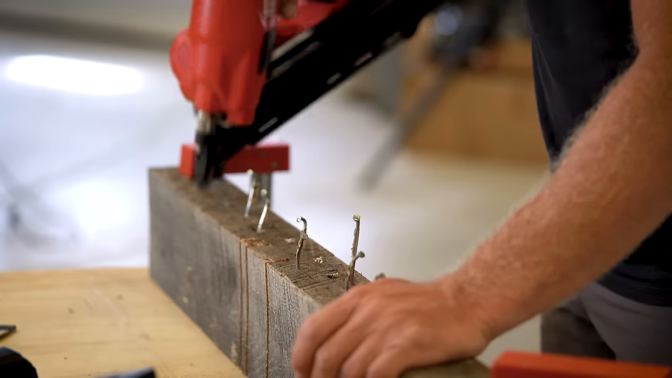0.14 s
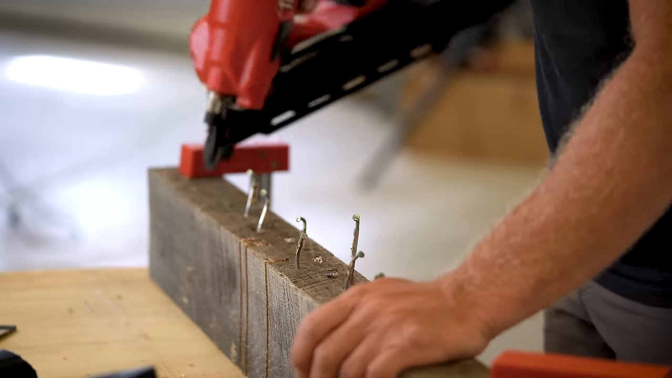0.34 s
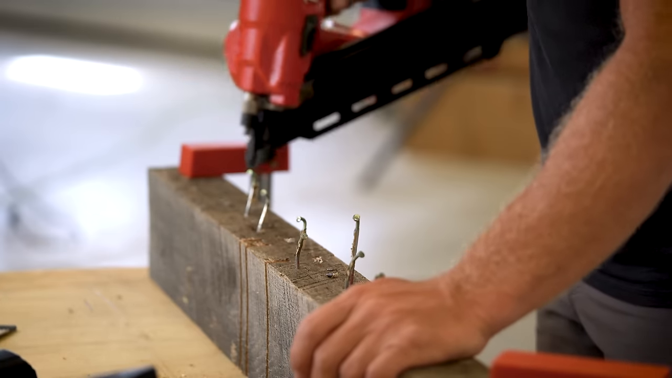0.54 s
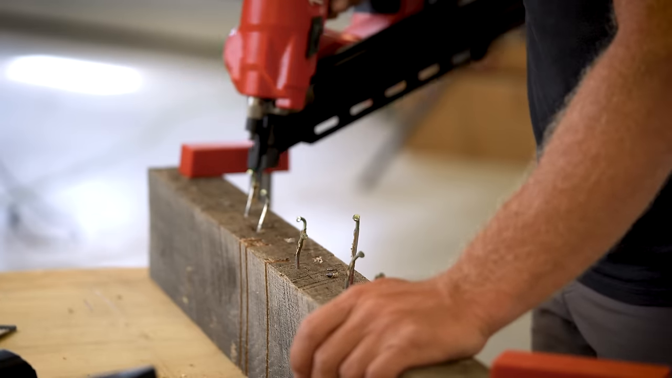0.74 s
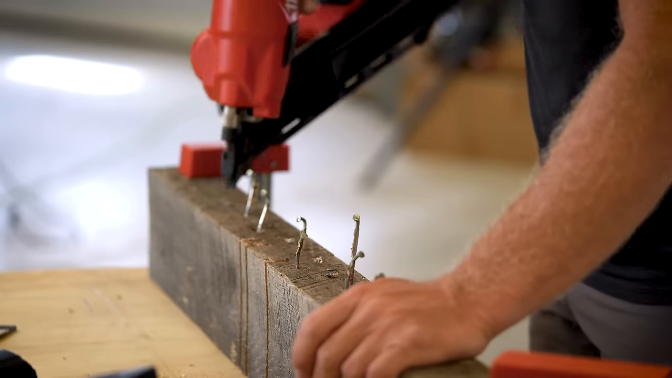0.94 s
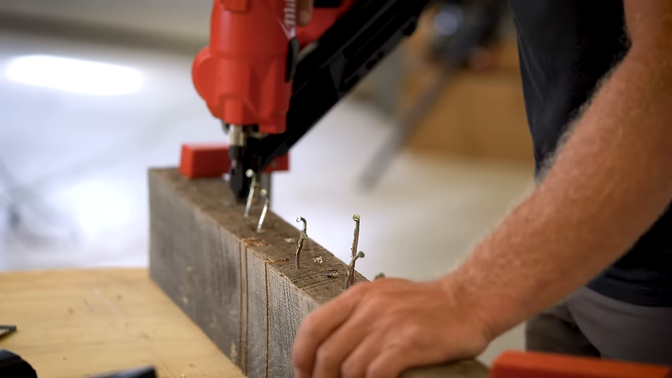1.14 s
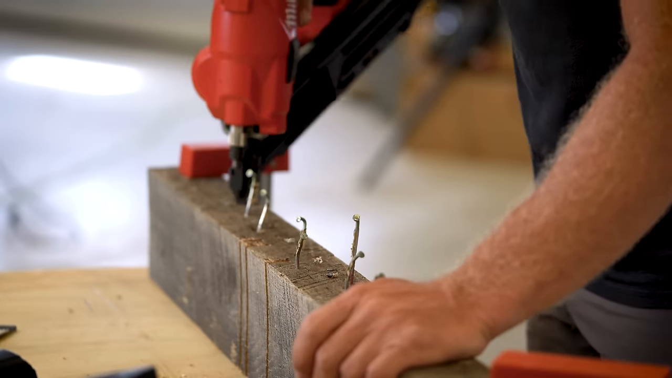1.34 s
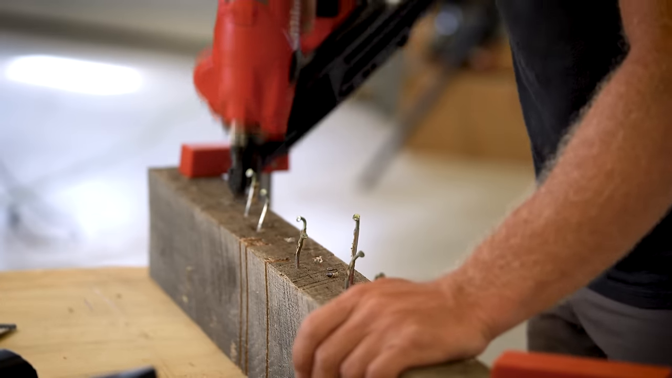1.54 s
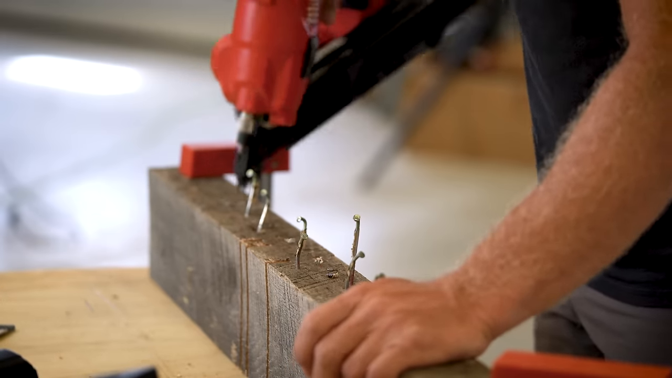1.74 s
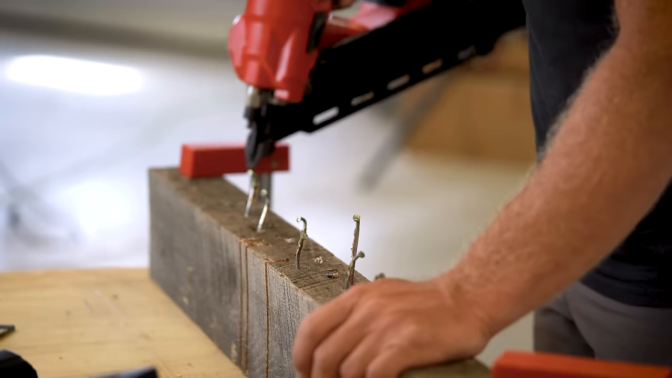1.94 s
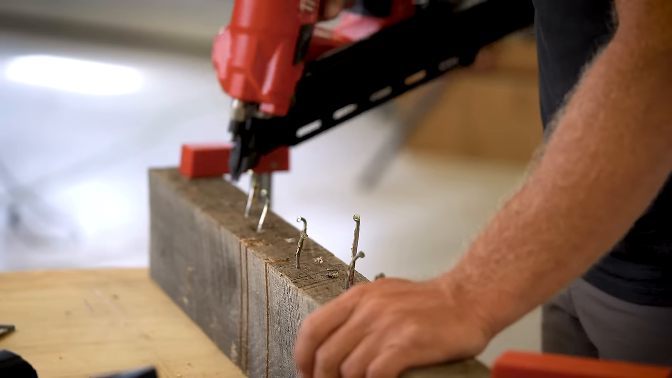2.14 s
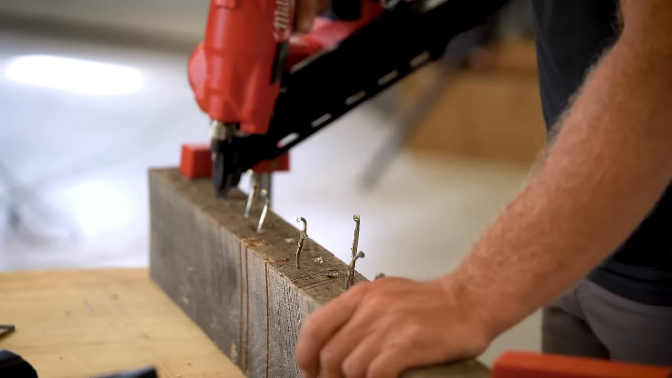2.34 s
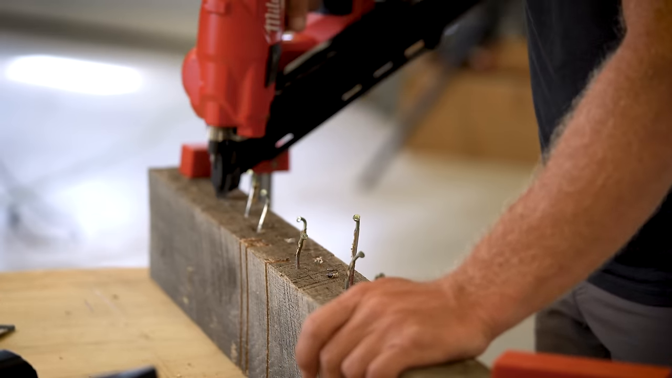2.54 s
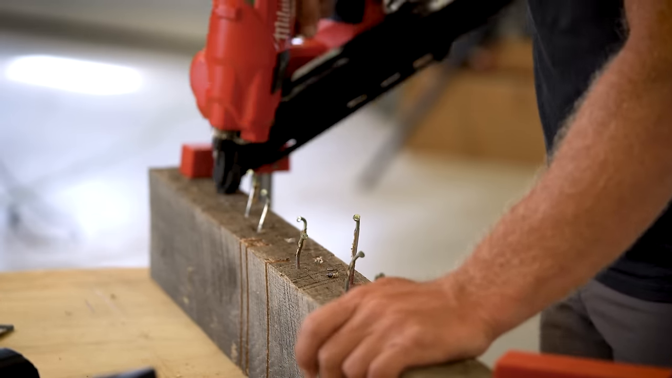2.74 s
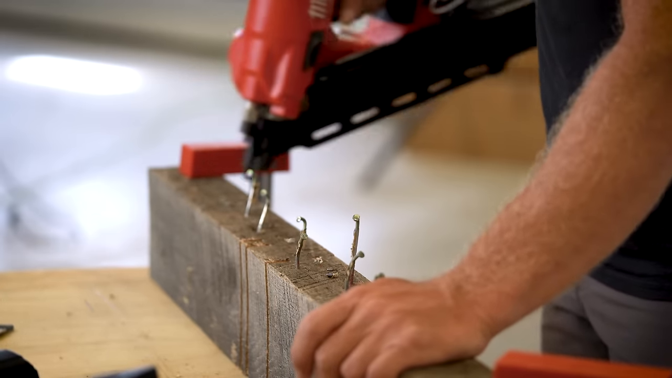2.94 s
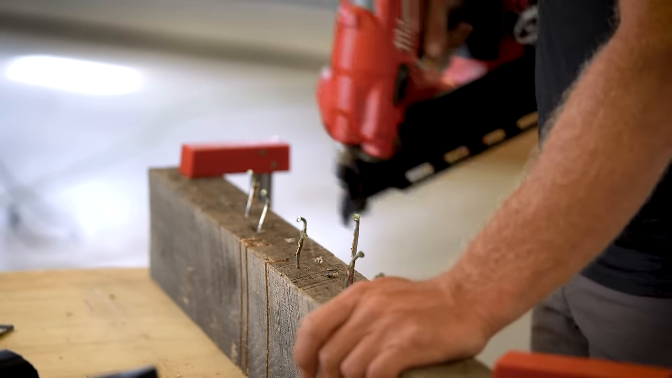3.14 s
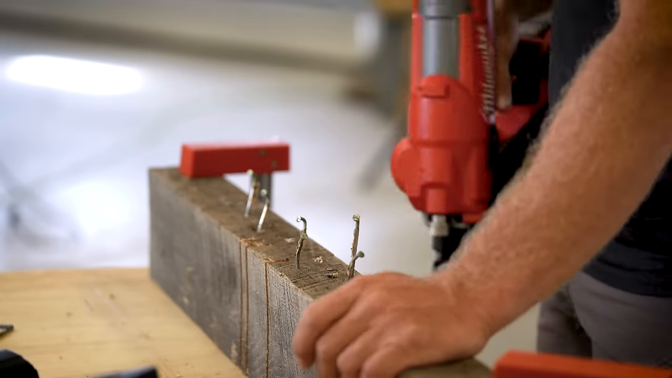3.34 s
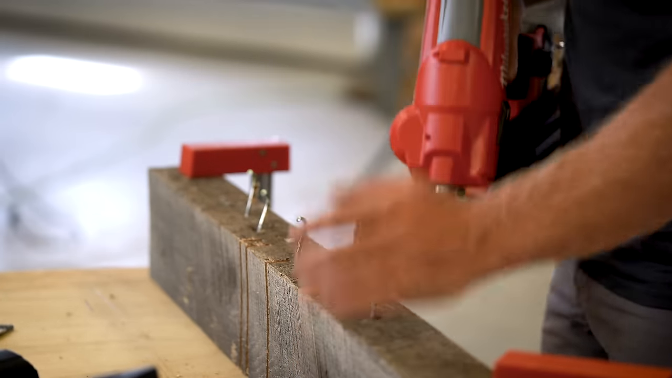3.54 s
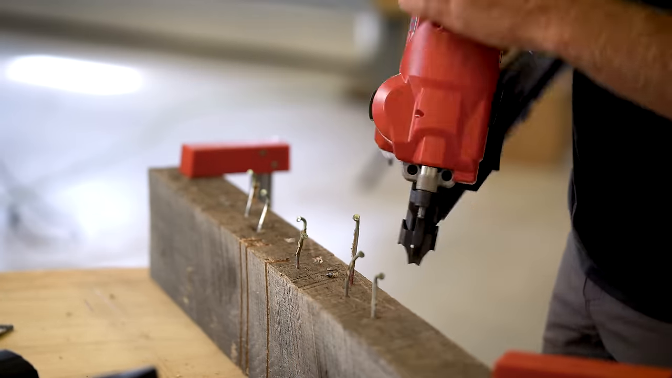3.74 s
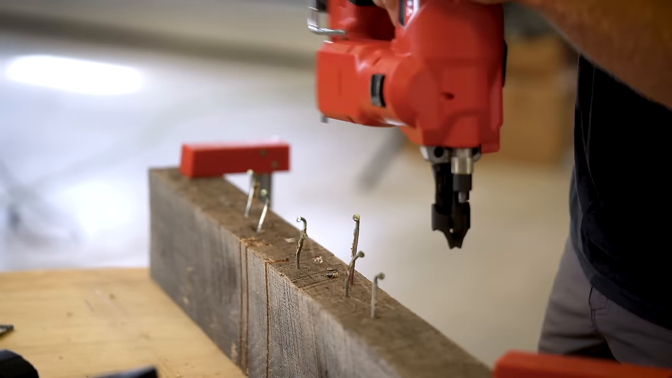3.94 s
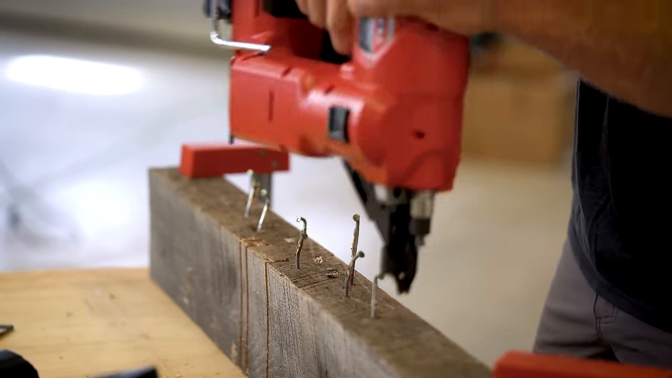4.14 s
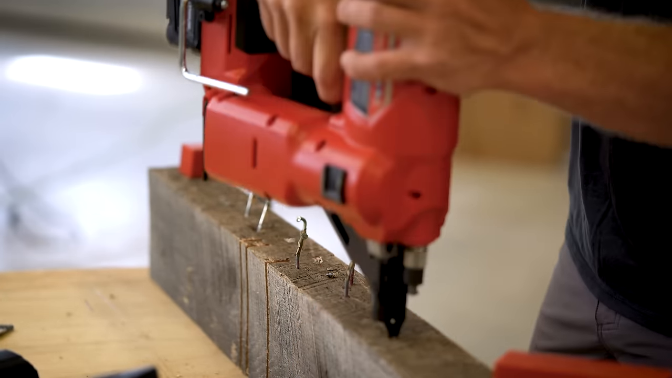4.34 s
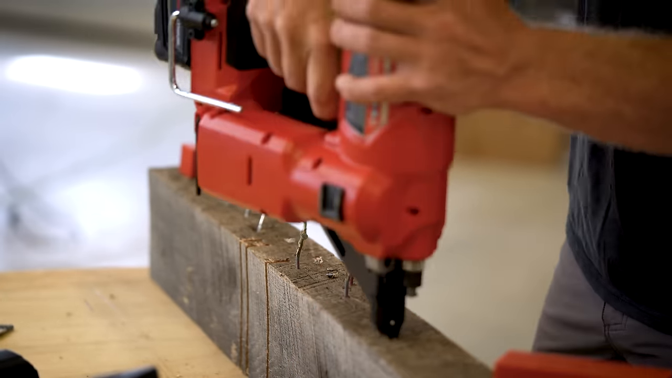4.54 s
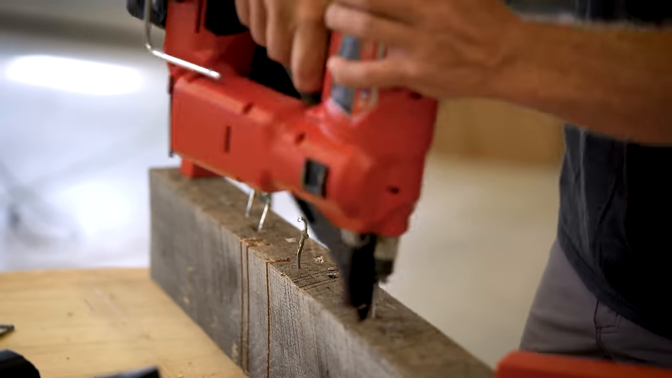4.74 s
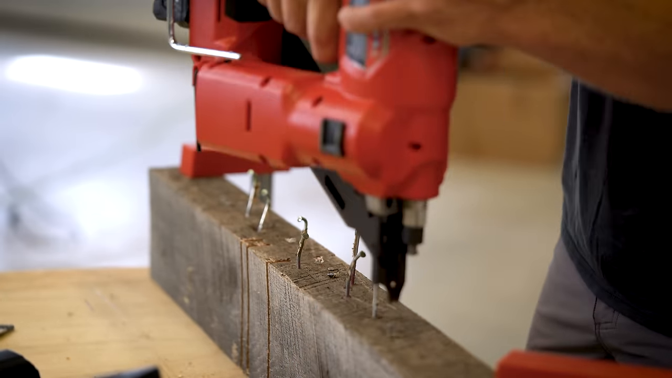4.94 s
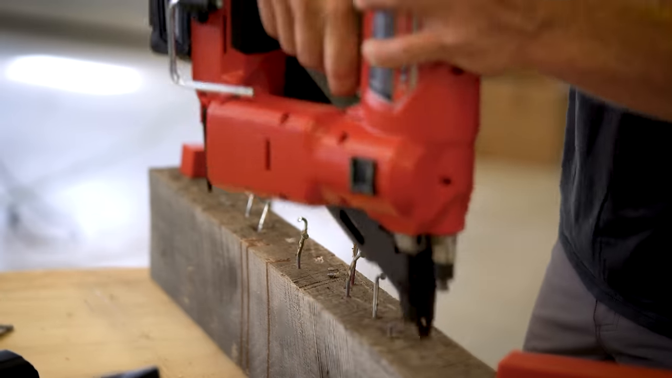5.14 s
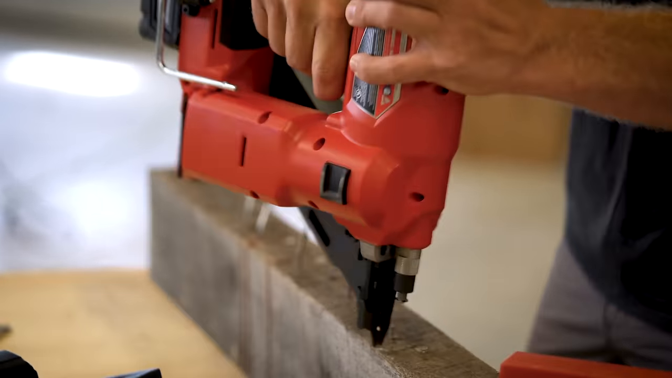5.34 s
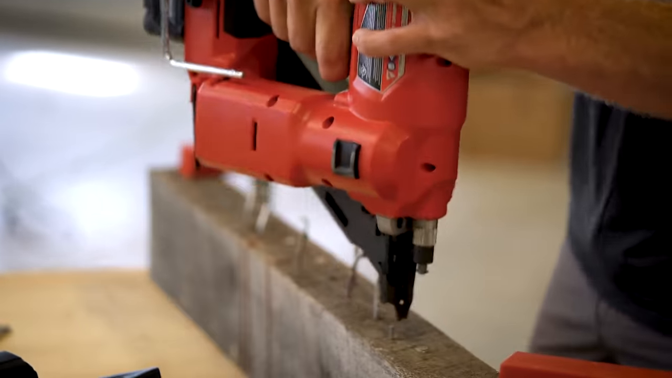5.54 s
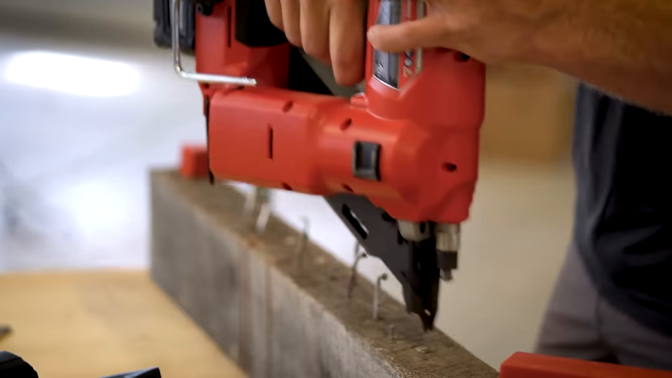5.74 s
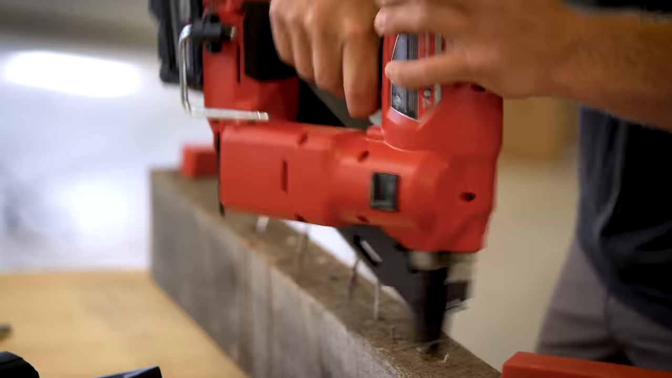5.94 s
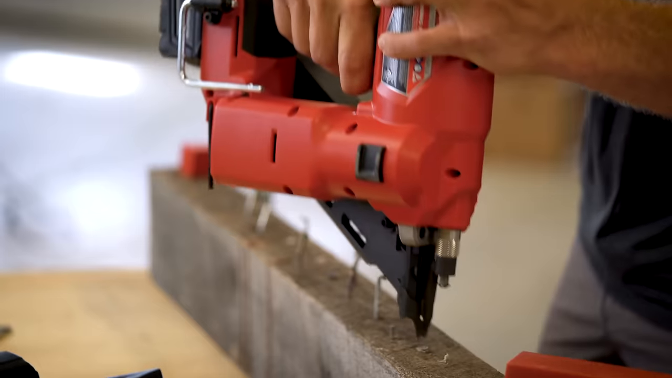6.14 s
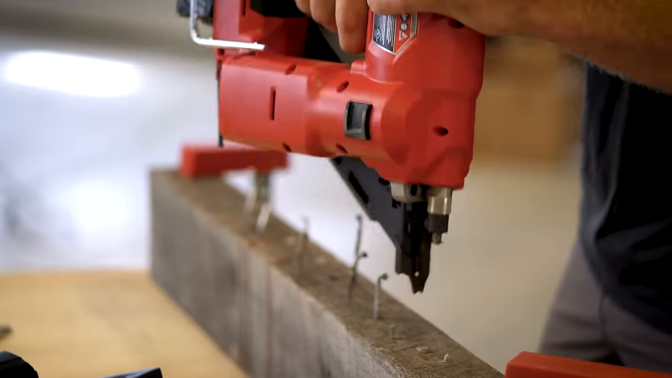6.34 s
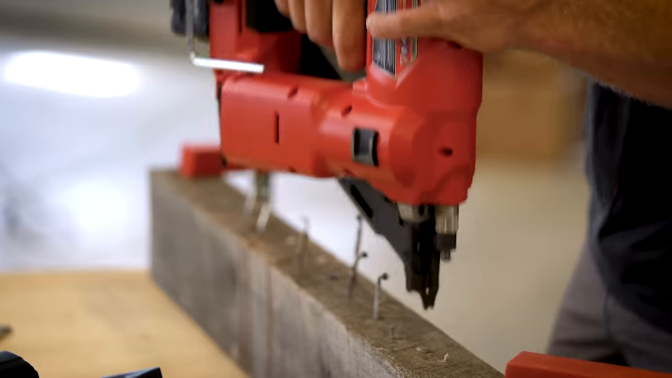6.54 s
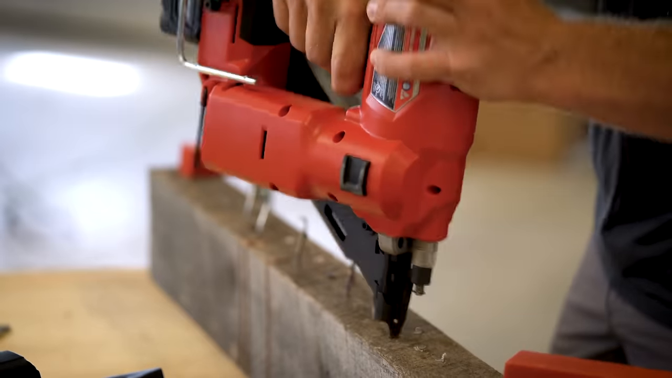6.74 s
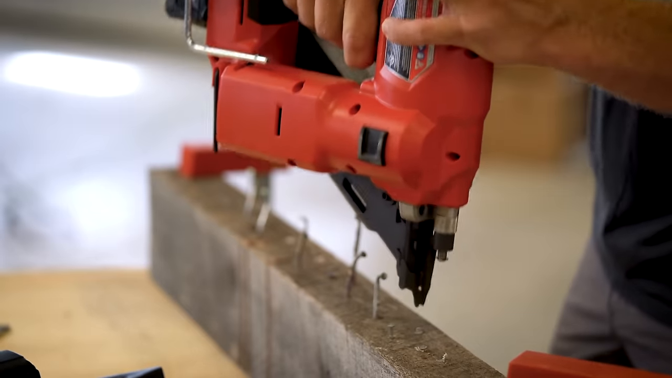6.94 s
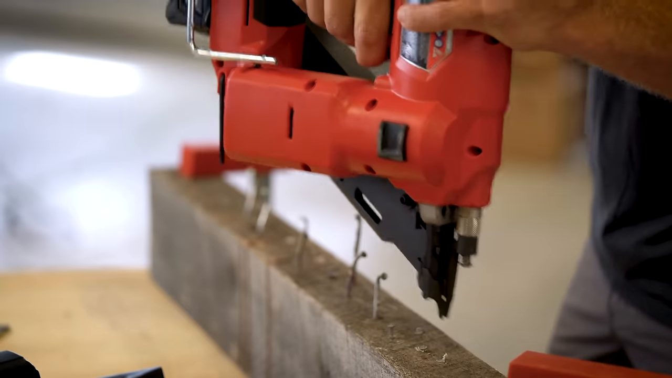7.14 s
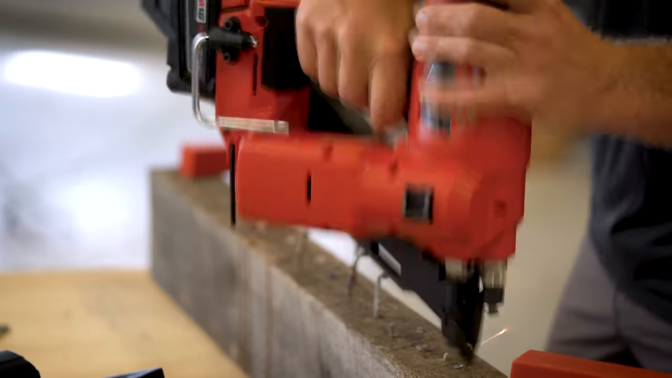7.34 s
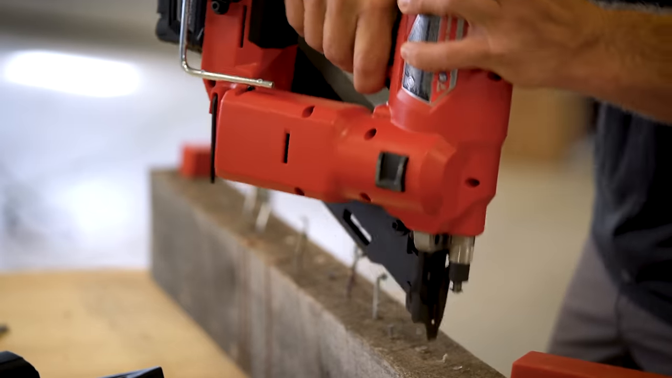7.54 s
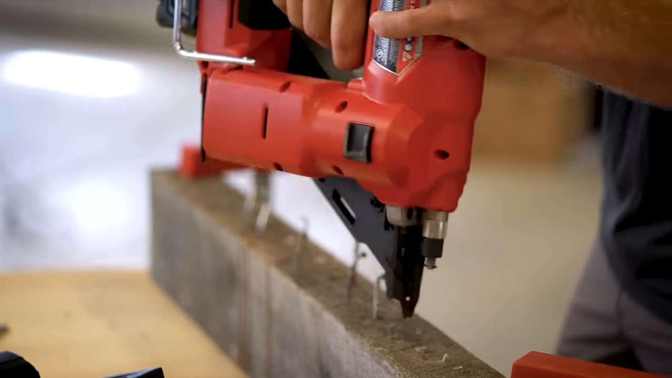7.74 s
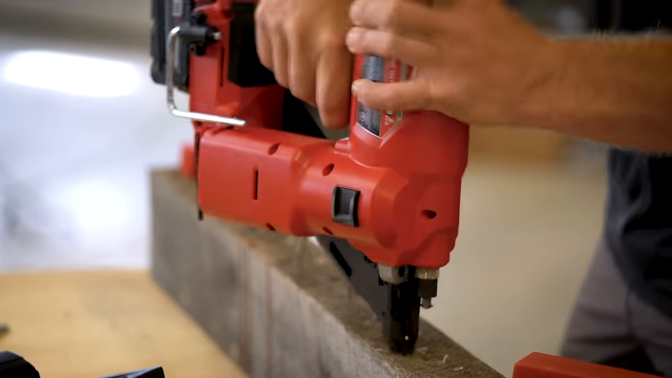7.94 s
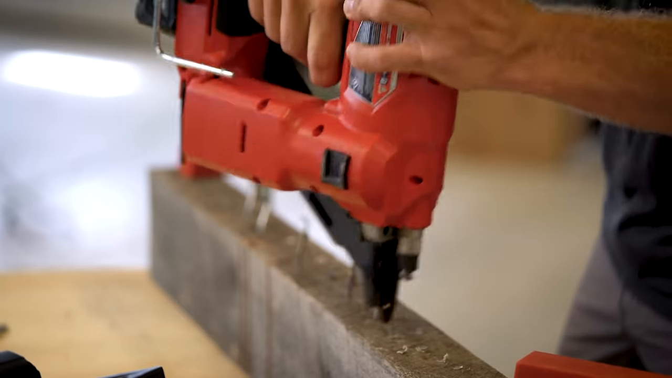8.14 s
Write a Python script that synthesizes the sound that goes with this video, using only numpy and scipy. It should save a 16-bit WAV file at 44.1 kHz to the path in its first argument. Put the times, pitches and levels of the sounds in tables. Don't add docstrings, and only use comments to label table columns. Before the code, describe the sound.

A cordless nail gun fires nine harsh, overloaded shots into a dense wooden beam, each followed by a short ratcheting motor whine in a hard, echoing hall.

```python
import sys
import numpy as np
from scipy import signal
from scipy.fft import rfft, irfft, next_fast_len
from scipy.io import wavfile
from scipy.ndimage import uniform_filter1d

SR = 44100
rng = np.random.default_rng(int(sys.argv[2]) if len(sys.argv) > 2 else 0)


def log_audio(samples):
    frames = np.atleast_2d(samples).T
    limited = np.clip(frames, -1, 1)
    pcm = np.round(limited * 32767).astype(np.int16)
    wavfile.write(sys.argv[1], SR, pcm)


def boost_factor(decibels):
    exponent = np.asarray(decibels, float) / 20
    return 10 ** exponent


N = 366030


def at_hz(points, hz, axis=1):
    return np.interp(np.log(hz + 1), np.log(np.array(points)[:, 0]), np.array(points)[:, axis])


def coloured(spectrum):
    size = next_fast_len(N)
    gain = boost_factor(at_hz(spectrum, np.fft.rfftfreq(size, 1 / SR)))
    noise = irfft(rfft(rng.standard_normal(size)) * gain, size)[:N]
    return noise / noise.std()


def bursts(times, levels_db, t60s, rise_s):
    env = np.zeros(N + SR)
    for s, level_db, t60 in np.broadcast(times, levels_db, np.clip(t60s, .004, .5)):
        t = np.arange(int((rise_s + 1.5 * t60) * SR)) / SR
        first = int(max(s - rise_s, 0) * SR)
        rise = np.minimum(t / rise_s, 1) ** 2
        fall = boost_factor(level_db - 60 * np.maximum(t - rise_s, 0) / t60)
        env[first:first + len(t)] += fall * rise
    return env[:N]


def grain(spread_db, size):
    jumps = boost_factor(spread_db * rng.standard_normal(N // size + 1))
    gain = uniform_filter1d(np.repeat(jumps, size)[:N], size // 2)
    return gain / np.sqrt(np.mean(gain ** 2))


def body(force, modes):
    out = np.zeros(N)
    for k, (hz, level_db, t60) in enumerate(modes):
        r, w = boost_factor(-60 / (max(t60, .01) * SR)), 2 * np.pi * hz / SR
        ring = signal.lfilter([0, np.sin(w)], [1, -2 * r * np.cos(w), r * r], force + 1e-18)
        out += (-1) ** k * boost_factor(level_db) * ring
    return out


def soften(x, hz):
    return signal.sosfilt(signal.butter(2, hz, fs=SR, output="sos"), x)


# pitch_hz, level_db (per Hz)
AIR = [(8.8, -35), (15, -7), (43, -8), (70, -12.5), (126, -20.5), (509, -23), (2000, -29.5), (5220, -50),
       (15800, -46)]


def room_tone():
    return boost_factor(-67) * coloured(AIR)


# start_s, metal_db (peak), wood_db
PRESSES = [(0.0283, -16.5, -20.5), (5.243, -14.5, -21), (5.88, -16, -27.5), (6.6424, -15, -18),
           (7.327, -15.5, -22.5), (7.961, -14, -21)]
# start_s, metal_db (peak), gap_s, follower_db, jolt_db
LATCHES = [(0.0612, -10, 0.0073, -14.5, -20.5), (1.5075, -14, 0.0071, -15.5, -17),
           (2.6217, -11.5, 0.0081, -25, -23), (4.5509, -12, 0.0056, -19, -40.5),
           (5.2652, -8.5, .0074, -11, -9), (5.905, -11.5, 0.0065, -12.5, -10),
           (6.662, -12.5, 0.0074, -5, -13.5), (7.3437, -8, 0.0084, -9, -8.5),
           (7.981, -10.5, 0.0087, -7.5, -11)]
# start_s, metal_db (peak), wood_db
BUCKS = [(0.2218, -11.5, -12.5), (1.6505, -6.5, -8.5), (1.6586, -14, -12), (1.687, -23.5, -17.5),
         (2.7541, -12.5, -4.5), (2.7644, -29.5, -19.5), (2.875, -16, -46.5), (4.6321, -13, -35),
         (5.3403, -18, -15.5), (5.391, -20.5, -35), (5.927, -33.5, -41), (5.941, -37, -43),
         (6.0566, -20, -40), (6.739, -9, -11), (7.421, -12, -29), (6.7809, -7, -22)]
# start_s, metal_db (peak), wood_db
DROPS = [(0.167, -23, -9), (1.609, -30, -21), (2.7157, -27, -7), (4.653, -20, -21), (5.371, -14, -25),
         (6.0167, -5.5, -19), (6.7746, -1.5, -26), (7.453, -16, -21), (8.087, -18, -14)]
# start_s, metal_db (peak)
SEATS = [(0.194, -8.5), (1.631, -12), (2.7437, -2), (4.6781, -15), (5.398, -12), (6.04, -12), (6.7964, -13),
         (7.481, -10), (8.1148, -12.5)]


def contacts():
    rows = [(s, metal, wood, wood - 5, 0.063) for s, metal, wood in PRESSES]
    rows += [(s, metal, wood, wood - 3, 0.051) for s, metal, wood in BUCKS]
    for s, metal, gap, follower, jolt in LATCHES:
        rows.append((s, metal, jolt - 6, -99, .04))
        rows.append((s + gap, follower, follower - 10, jolt, .04))
    rows += [(s, metal, wood, wood - 5, 0.014) for s, metal, wood in DROPS]
    rows += [(s, metal, metal - 18, metal - 11.5, 0.023) for s, metal in SEATS]
    return rows


# pitch_hz, level_db (per Hz)
METAL = [(880, -24.5), (1500, 4), (2080, -33), (2430, -5.5), (3020, -13.5), (4180, 0), (5740, -4.5),
         (6520, -3), (15800, -12)]
# pitch_hz, level_db (per Hz)
WOOD = [(150, -16.5), (400, -6), (1000, -0.5), (1800, -0.5), (3000, -9), (6000, -23.5)]
# pitch_hz, level_db (per Hz)
JOLT = [(40, -24.5), (80, -9), (150, 5), (220, 1), (400, -5.5), (700, -34)]
# pitch_hz, level_db, t60_s
NOSE = [(1160, -45.5, .02), (1480, -35.5, 0.04), (2700, -39, .02), (4670, -31, 0.011), (7700, -37, 0.015)]


def clacks():
    s, metal_db, wood_db, thump_db, t60 = np.transpose(contacts())
    metal = bursts(s + 0.00052, metal_db - 8, t60, rise_s=0.0014) * coloured(METAL) * grain(2.6, size=24)
    nose = boost_factor(-4.5) * body(metal, NOSE)
    knock = bursts(s + .0015, wood_db - 5, t60 * 1.2, rise_s=.002) * coloured(WOOD)
    thump = bursts(s + 0.0086, thump_db - 11.5, 0.18, rise_s=0.007) * coloured(JOLT)
    return metal + nose + knock + thump


# start_s, beam_db, bench_db, shudder_db, facing_db (tool towards the microphone)
SHOTS = [(0.12, -7.5, -16.5, -28, -6), (1.5647, -9, -15, -25, -6), (2.671, -3, -20.5, -19, -5),
         (4.6038, -14, -21, -20, 0), (5.3241, -7.5, -28, -21.5, 4), (5.966, -9.5, -31, -17.5, 4.5),
         (6.723, -6, -23.5, -15.5, 9), (7.4052, -6.5, -27.5, -18.5, 7), (8.041, -8, -19, -20, 7.5)]
# start_s, peak_db, release_db (click), ring_db (rack)
TEETH = [(0.242, -21, -5, -6), (0.2761, -12, -12.5, -17.5), (0.3119, -17, -9, -3), (0.3496, -18, -7, -1),
         (0.3897, -22, -20, 3), (1.6862, -21.5, -10, -10), (1.7203, -16, -11, -7.5),
         (1.7562, -13.5, -14, -12), (1.795, -18, -9, -8), (1.8329, -19.5, -16, 7),
         (2.7929, -16, -11, -11.5), (2.826, -14.5, -11, -3.5), (2.8645, -13, -11, -6),
         (2.9014, -16.5, -11, -1), (2.9406, -22, -9.5, 6), (4.7254, -14.5, -20, -14),
         (4.761, -9, -17.5, -12), (4.7966, -16, -13, 2), (4.835, -14.5, -9, 0), (4.8734, -17.5, -8, 4),
         (5.447, -13, -11, -6), (5.4823, -13.5, -10, -1), (5.518, -12.5, -12, -2), (5.5572, -15.5, -8, 5.5),
         (6.0887, -14, -7, 2), (6.1237, -13.5, -12, -2), (6.1597, -15, -16, 4), (6.1984, -16, -14, 5),
         (6.2379, -19, -12, 7), (6.8466, -15.5, -10, -6), (6.88, -14.5, -18, 6), (6.9186, -17, -18, 5),
         (6.9561, -17, -15, 9), (6.9975, -20, -8, 4), (7.5296, -14.5, -11, 1), (7.5643, -14, -12, 4),
         (7.601, -18, -13, 9), (7.639, -16, -10, 5), (7.6788, -18, -8, 8), (8.1667, -15, -6, -6),
         (8.1993, -13, -18, -1.5), (8.2394, -15, -10, 8), (8.2781, -16.5, -11, -3)]
# offset_s (from the shot), mesh_hz (gear teeth meeting), rattle_db
WIND = [
    (-.06, 716, -30),
    (-.045, 1100, -8),
    (-.005, 2185, 1.5),
    (.05, 2840, -0.5),
    (.12, 2785, -3.5),
    (.2, 2600, -4.5),
    (.275, 2450, -2),
    (.292, 2393, 2.5),
    (.305, 2200, -25),
]
# multiple (of mesh_hz), level_db, loudest_s (after shot), width_s, spinup_db
WHINE = [(.424, -5, .26, .05, -3), (.87, -5, .155, .06, -60), (1, -4, .14, .14, -14),
         (1.02, -2, .265, .045, -60), (1.69, -5, .2, .07, -7), (2.04, -9, .24, .06, -60),
         (2.07, -14, .1, .035, -60), (3.05, -22, .23, .04, -60)]
# under_mesh_db, mesh_db, middle_db, spinup_db
RUNS = [(2, 1, 2, 2), (-2, 1, 3, 1), (0, 3, -3, 1), (-2, 4, 3, -1), (-3, 1, 2, -3), (-3, 0, 1, -3),
        (-4, -2, -5, -1), (-3, 1, -1, -1), (-3, 0, -1, -3)]
# pitch_hz, level_db (per Hz)
MOTOR = [(59, -39.5), (100, -16.5), (534, -5), (906, -2.5), (1100, -1.5), (2260, -7.5), (2560, -5.5),
         (3230, -9.5), (5150, -8), (5610, -12), (15800, -28.5)]


def motor():
    t, (offset, mesh_hz, rattle_db) = np.arange(N) / SR, np.transpose(WIND)

    caught, tooth_gap_s, step_share = np.transpose(TEETH)[0], .037, .7
    after = t - caught[np.searchsorted(caught, t) - 1]
    lead = step_share * (after - tooth_gap_s / 2) * (after > 0) * (after < tooth_gap_s)

    pitch, rattle, high, since, mesh, middle, under, start = np.zeros((8, N))
    for shot, run, (latch, *_) in zip(SHOTS, RUNS, LATCHES):
        s, facing_db = shot[0], shot[-1]
        under_db, mesh_db, middle_db, spin_db = run
        on = (t > latch) & (t < s + offset[-1])
        spin_up = (t[on] - s) * offset[0] / (latch - s)
        since[on] = np.where(t[on] < s, spin_up, t[on] - s)
        pitch[on] = np.interp(since[on] - lead[on], offset, mesh_hz)
        rattle[on] = boost_factor(-26 + np.interp(since[on], offset, rattle_db))
        high[on], middle[on] = boost_factor(facing_db), boost_factor(facing_db + middle_db)
        mesh[on], under[on], start[on] = boost_factor(-3.5 + mesh_db), boost_factor(under_db), boost_factor(spin_db)

    wander_hz = 45
    pitch += wander_hz * np.log(grain(3.0, size=150))
    phase = 2 * np.pi * np.cumsum(uniform_filter1d(pitch, size=400)) / SR
    whine = np.zeros(N)
    for multiple, level_db, loudest, width, spinup_db in WHINE:
        if multiple == .87:
            strength = under
        elif multiple < 1.5:
            strength = mesh
        else:
            strength = middle if multiple < 2 else high
        swell = boost_factor(level_db - 9 * ((since - loudest) / width) ** 2) * strength
        spinning_up = boost_factor(spinup_db + 350 * since) * start * (since < 0)
        flutter = grain(3.0 if multiple > 1.5 else 2.5, size=300)
        whine += (swell + spinning_up) * flutter * np.sin(multiple * phase)

    noise = coloured(MOTOR) * grain(2.8, size=40)
    dull = signal.sosfiltfilt(signal.butter(2, 4000, fs=SR, output="sos"), noise)
    hiss = boost_factor(np.where(since < 0, -8.5, -4))
    return rattle * (dull + hiss * (noise - dull) + whine)


# crack_db, bottom_s (driver bottoms out, after the shot), bottom_db
NAILS = [(-2, 0.0076, -0.5), (4.5, 0.018, -1), (1.5, 0.01, -3.5), (-2.5, 0.013, 6.5), (-4, 0.0028, -8),
         (-0.5, 0.0051, -3.5), (2, 0.0075, -4), (0, 0.01, 2), (0.5, 0.021, -10)]
# t60_s, second_db
TEARS = [(.038, -13.5), (0.02, -17), (0.028, -15.5), (.045, -13), (0.068, -8), (.038, -15.5),
         (0.022, -13.5), (.036, -15), (.04, -11)]
# pitch_hz, level_db (per Hz)
CRACK = [(180, -24.5), (300, -0.5), (1360, -4), (3170, -15.5), (4200, -11), (4880, -10.5), (7510, -13),
         (9960, -14.5), (15800, -24.5)]


def cracks():
    s = np.transpose(SHOTS)[0]
    crack_db, bottom_s, _ = np.transpose(NAILS)
    tear_t60, second_db = np.transpose(TEARS)
    level_db = -1.1
    env = bursts(s + bottom_s, level_db + second_db, 0.023, rise_s=0.0024)
    env += bursts(s + 0.0023, level_db + crack_db + 2, tear_t60, rise_s=0.0015)
    env += bursts(s, level_db - 15.5, 0.077, rise_s=0.001)
    return env * coloured(CRACK) * grain(3.6, size=30)


# pitch_hz, level_db, t60_s
BEAM = [(165, -1, 0.034), (235, -3, 0.052), (346, -2, 0.085), (418, -8.5, 0.1), (474, -0.5, 0.038),
        (564.2, 2.5, 0.049), (641, -0.5, 0.045), (763, -1.5, 0.03), (908, -2.5, 0.04), (1140, -3, 0.045),
        (1306, -4.5, 0.042), (1436, -2, 0.047), (1643, -8.5, 0.047), (2200, -15, 0.016)]
# low_db, lower_middle_db, upper_middle_db, high_db
SPOTS = [(2.5, -2.5, -0.5, 3), (-2, -6, -1, 2), (2, -1, -3.5, -4), (1, -2, -2.5, -1.5), (2, -1, -8, -1.5),
         (-3, -0.5, 3, -0.5), (-1.5, -1, 3, -1), (1, -2, -2, -3.5), (0.5, 1, -1.5, -2)]
SPLIT_HZ = (0, 300, 850, 1200, 3000)


def beam(force):
    struck = np.searchsorted(np.transpose(SHOTS)[0][1:] - .1, np.arange(N) / SR)
    out = np.zeros(N)
    for low, high, spot_db in zip(SPLIT_HZ, SPLIT_HZ[1:], np.transpose(SPOTS)):
        group = [mode for mode in BEAM if low <= mode[0] < high]
        out += body(force * boost_factor(spot_db)[struck], group)
    return out


# start_s, level_db
ROCKS = [(.168, -40.5), (.192, -41), (1.609, -36), (1.636, -38), (2.715, -46), (2.763, -35), (4.649, -40.5),
         (4.685, -44), (5.369, -36.5), (5.395, -47), (6.0, -41), (6.03, -46), (6.754, -35.5), (6.78, -45),
         (7.45, -45.5), (7.48, -43), (8.074, -39), (8.1, -45)]


def beam_blows():
    s, beam_db, _, shudder_db, _ = np.transpose(SHOTS)
    _, bottom_s, bottom_db = np.transpose(NAILS)
    push = rng.standard_normal(N)
    blow = bursts(s + 0.00071, beam_db - 24.5, 0.038, rise_s=0.0021)
    blow += bursts(s + bottom_s, beam_db + bottom_db - 25.5, 0.04, rise_s=0.0011)
    shudder = bursts(s + 0.015, shudder_db - 22.5, 0.4, rise_s=0.03) * grain(4.4, size=200)
    rock = soften(bursts(*np.transpose(ROCKS), .05, rise_s=0.0025) * push, 902)
    return beam(push * (blow + shudder) + rock)


# pitch_hz, level_db, t60_s
BENCH = [(39, -10, 0.062), (68.4, 2.5, 0.38), (107, -10.5, 0.35)]
# pitch_hz, level_db (per Hz)
THUMP = [(30, -15.5), (60, -3), (130, 8), (220, -5.5), (400, -6.5), (700, -34)]


def bench():
    s, _, bench_db, *_ = np.transpose(SHOTS)
    push = rng.standard_normal(N) * bursts(s + 0.015, bench_db - 28.5, 0.17, rise_s=0.034)
    boom = bursts(s + 0.011, bench_db + 7.5, 0.13, rise_s=0.0073) * coloured(THUMP)
    return body(push, BENCH) + boom


# pitch_hz, level_db (per Hz)
TOOTH = [(1760, -42), (3000, -14.5), (3700, -16), (4560, -7), (4920, -0.5), (6500, -5), (9470, -7.5),
         (15800, -16)]


def teeth():
    s, on_db, off_db, ring_db = np.transpose(TEETH)
    shot_s = np.transpose(SHOTS)[0]
    early = s - shot_s[np.searchsorted(shot_s, s) - 1] < .175
    on = bursts(s + 0.00088, on_db - 6, 0.016, rise_s=0.001)
    off = bursts(s + 0.014, on_db + off_db - 2, 0.019, rise_s=.001)
    push = rng.standard_normal(N)
    long, short = (bursts(s[k] + 0.00053, (on_db + ring_db)[k], 0.022, rise_s=0.0018) * push
                   for k in (early, ~early))
    rings = body(long, [(4532, -26.5, 0.027), (5200, -30.5, .015)])
    rings += body(short, [(4480, -29.0, 0.0084), (5000, -24, 0.014), (6634, -32, .01)])
    return (on + off) * coloured(TOOTH) + rings


# start_s, metal_db (peak), wood_db
HANDLING = [(1.109, -27, -25.5), (1.129, -38, -30), (1.135, -29.5, -31), (1.19, -41.5, -38.5),
            (1.2142, -50, -39), (1.2314, -43.5, -46.5), (1.269, -38.5, -39), (1.443, -47, -58),
            (1.482, -66, -48), (1.497, -59, -43.5), (2.3183, -24.5, -21.5), (2.34, -35.5, -37.5),
            (3.422, -62.5, -72), (3.52, -63.5, -67.5), (3.809, -53, -57.5), (3.896, -52, -50),
            (3.9224, -60, -50.5), (4.024, -75, -54.5), (4.052, -48, -64.5), (4.0709, -38.5, -44.5),
            (4.112, -46, -47), (4.138, -39.5, -45.5), (4.328, -50.5, -51.5), (4.407, -23, -29),
            (4.4117, -21, -26), (5.597, -32.5, -39), (5.6144, -40, -33), (7.8985, -30, -43)]
# pitch_hz, level_db (per Hz)
TOUCH = [(500, -25.5), (1000, -7), (1700, -11), (2600, -11), (4700, 0), (7000, -4.5), (11000, -7.5),
         (15800, -25)]


def touches():
    s, tap_db, wood_db = np.transpose(HANDLING)
    dull_below_db, bright_above_db = -60.5, -31
    softness = np.clip((bright_above_db - tap_db) / (bright_above_db - dull_below_db), 0, 1)
    top_db = tap_db - 20 * softness
    noise = coloured(TOUCH) * grain(2.4, size=24)
    dull = soften(noise, 3000)
    tap = bursts(s, tap_db - 4, 0.058, rise_s=0.0014) * dull
    tap += bursts(s, top_db - 5.5, 0.033, rise_s=0.00034) * (noise - dull)
    knock = bursts(s + 0.00062, wood_db - 4.5, 0.053, rise_s=0.001) * coloured(WOOD)
    nose = boost_factor(-4.5) * body(tap + knock, NOSE)
    thump = bursts(s + 0.021, wood_db - 20.5 - 10.5, 0.32, rise_s=.014) * coloured(THUMP)
    return tap + knock + nose + thump


# start_s, level_db
RUSTLE = [
    [(1.14, -84), (1.2, -68), (1.3, -76), (1.42, -84), (1.46, -76), (1.5, -66)],
    [(2.33, -70), (2.42, -70), (2.55, -84)],
    [(3.3, -79), (3.52, -77.5), (3.75, -86.5), (3.816, -70), (3.85, -79.5), (3.97, -68.5), (4.0, -80),
     (4.05, -80.5), (4.4, -85.5)],
]


def rustle():
    t, level = np.arange(N) / SR, np.zeros(N)
    for s, level_db in map(np.transpose, RUSTLE):
        level += boost_factor(np.interp(t, s, level_db, -120, -120))
    cloth = [(2500, -16.5), (4500, 7.5), (8000, -3.5), (12000, -9.0), (15800, -11)]   # pitch_hz, level_db
    return level * coloured(cloth) * grain(2.5, size=200)


# start_s, pitch_hz, level_db
SQUEAKS = [
    [(2.09, 11000, -100), (2.134, 11880, -81), (2.258, 10830, -84), (2.31, 11800, -82), (2.41, 14200, -86),
     (2.43, 14100, -84), (2.47, 12000, -86), (2.49, 11000, -100)],
    [(6.34, 12700, -95), (6.42, 12600, -77), (6.47, 12250, -79), (6.51, 11500, -77), (6.545, 9600, -84),
     (6.57, 9800, -95), (6.6, 11000, -82), (6.635, 12100, -80)],
    [(4.49, 9500, -95), (4.51, 11500, -82), (4.54, 15000, -82), (4.55, 15500, -90)],
]


def squeaks():
    t, out = np.arange(N) / SR, np.zeros(N)
    for s, hz, level_db in map(np.transpose, SQUEAKS):
        pitch = uniform_filter1d(np.interp(t, s, hz), size=800)
        tone = np.sin(2 * np.pi * np.cumsum(pitch) / SR)
        out += boost_factor(np.interp(t, s, level_db, -150, -150) + 3) * tone
    return out


# start_s, peak_db, t60_s
SNAP = [
    (5.5871, 1, 0.023),
]
# pitch_hz, level_db (per Hz)
SNAP_COLOUR = [(290, -47), (500, -18.5), (2420, -5), (3000, -7), (4130, 2), (5680, -11.5), (6470, -6.5),
               (9020, -9.5), (15800, -25.5)]


def snap():
    s, snap_db, t60 = np.transpose(SNAP)
    return bursts(s + 0.0015, snap_db, t60, rise_s=0.00024) * coloured(SNAP_COLOUR)


SCATTER_HZ = (300, 2200)
PATHS_S = (0, .009, .019, .031, .044, .06)


def scattered(x):
    low, below = (soften(x, hz) for hz in SCATTER_HZ)
    out = np.zeros(N + SR)
    for lag_s in PATHS_S:
        for part, step in ((below - low, 70), (x - below, 20)):
            points = np.arange(N // step + 2)
            sway = np.interp(np.arange(N) / step, points, rng.standard_normal(len(points)))
            out[int(lag_s * SR):][:N] += part * sway
    return low + out[:N] * np.sqrt(1.5 / len(PATHS_S))


# pitch_hz, t60_s, level_db
HALL = [(59.7, 0.43, -6.5), (150, 0.99, -7.5), (406, 1.294, -5.5), (1100, 1.544, -6), (1650, 1.705, -8.5),
        (2600, 1.576, -10), (4550, 1.61, -11.5), (8150, 0.76, -8.5), (12000, 0.99, -14.5),
        (16000, 0.31, -12.5)]
# pitch_hz, width_hz, added_db
ROOF = [(1660, 66, -1.5), (2610, 500, -2), (3330, 230, -9), (5030, 400, -11)]


def workshop(x):
    size = 2 * SR
    t, hz, tail = np.arange(size) / SR, np.fft.rfftfreq(size, 1 / SR), np.zeros(size)
    white = rfft(rng.standard_normal(size))
    for centre in 40 * 2 ** np.arange(0, 9, .5):
        band = irfft(white * np.clip(1 - 2 * np.abs(np.log2((hz + 1) / centre)), 0, 1), size)
        late = boost_factor(-42.5 - 60 * t / at_hz(HALL, centre)) * np.clip((t - .01) / 0.095, 0, 1)
        near = boost_factor(-26.5 - 60 * t / 0.086) * np.clip((t - .003) / 0.017, 0, 1)
        tail += boost_factor(at_hz(HALL, centre, axis=2)) * band * (late + near)
    walls = signal.fftconvolve(x, tail)[:N]
    favoured = np.zeros(N)
    for centre, width, added_db in ROOF:
        favoured += boost_factor(added_db) * signal.lfilter(*signal.iirpeak(centre, centre / width, fs=SR), walls)
    return walls + favoured


def scene():
    blows = clacks() + cracks() + beam_blows() + bench() + touches()
    gears = motor() + teeth()
    nail = snap()
    walls = workshop(scattered(blows + boost_factor(-3.5) * nail + boost_factor(-1.5) * gears))
    return (room_tone() + blows + gears + nail + walls + rustle() + squeaks())[None]


def top_cut(x):
    return signal.sosfilt(signal.butter(12, 16000, fs=SR, output="sos"), x)


def record(dry):
    clipped = np.clip(dry, -.97, .97)
    cut = signal.sosfiltfilt(signal.cheby2(10, 35, 16100, fs=SR, output="sos"), clipped)
    return top_cut(np.clip(cut, -1, 1))


dry = scene()
out = record(dry)
log_audio(out)
```